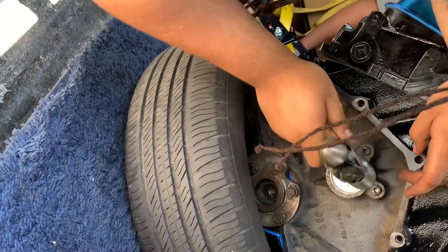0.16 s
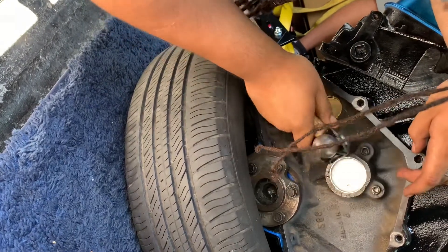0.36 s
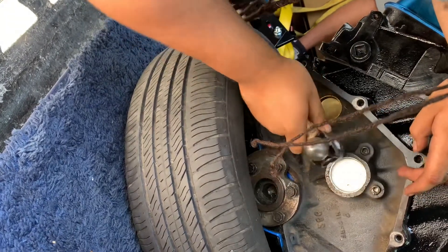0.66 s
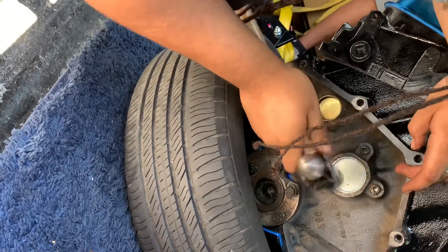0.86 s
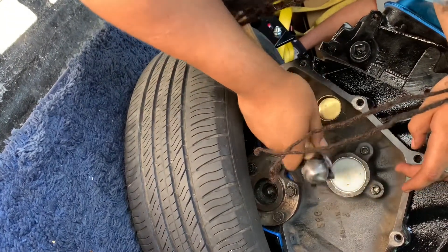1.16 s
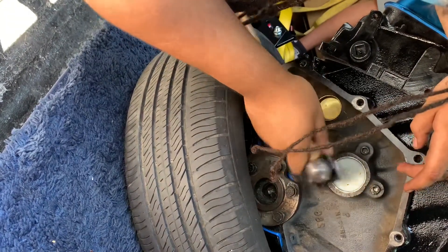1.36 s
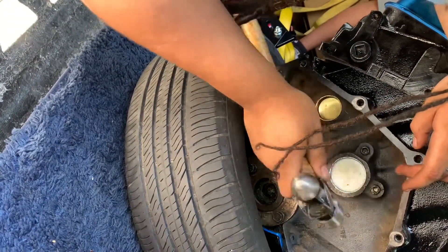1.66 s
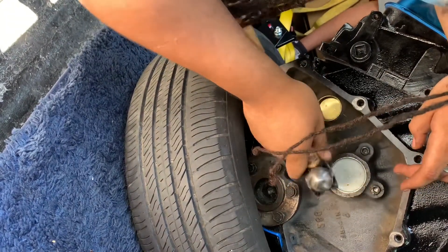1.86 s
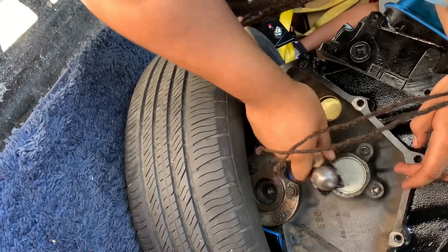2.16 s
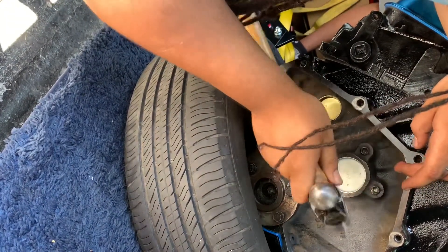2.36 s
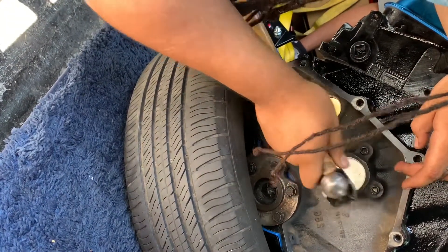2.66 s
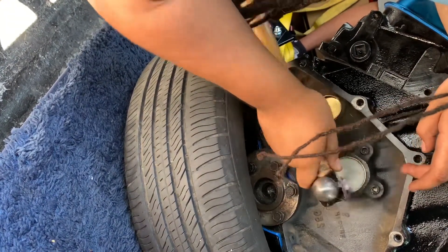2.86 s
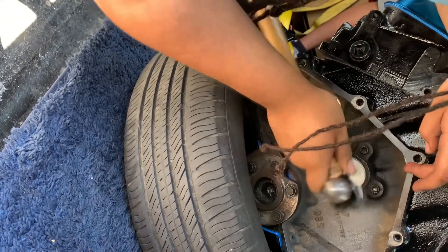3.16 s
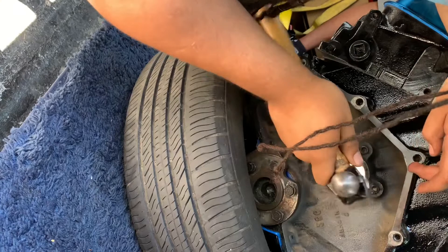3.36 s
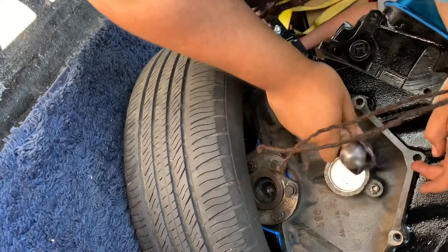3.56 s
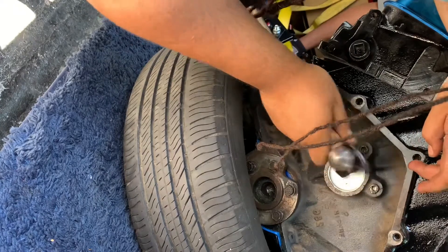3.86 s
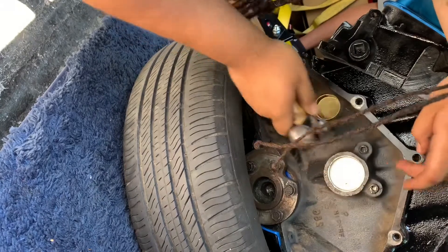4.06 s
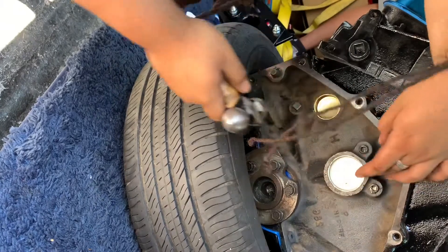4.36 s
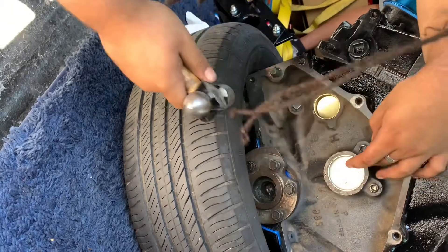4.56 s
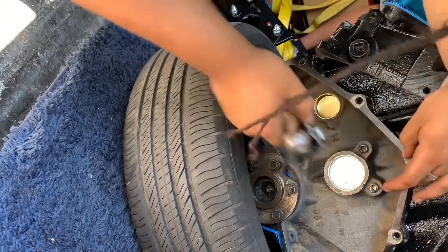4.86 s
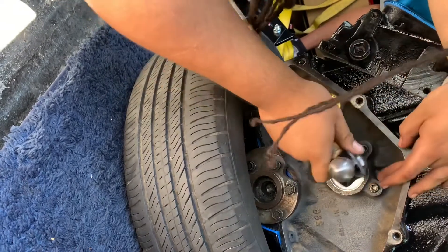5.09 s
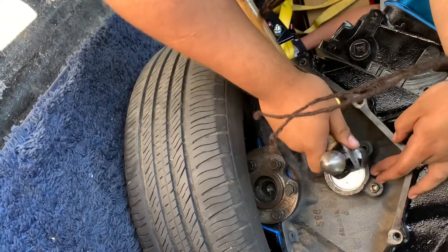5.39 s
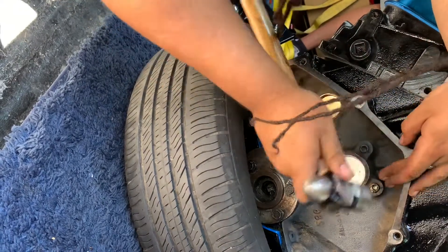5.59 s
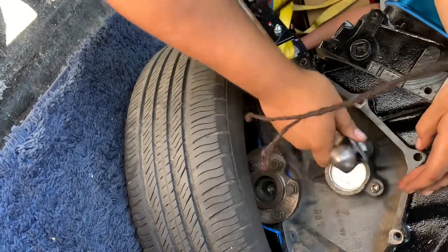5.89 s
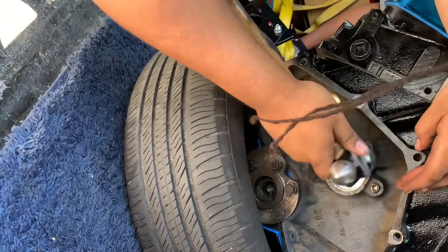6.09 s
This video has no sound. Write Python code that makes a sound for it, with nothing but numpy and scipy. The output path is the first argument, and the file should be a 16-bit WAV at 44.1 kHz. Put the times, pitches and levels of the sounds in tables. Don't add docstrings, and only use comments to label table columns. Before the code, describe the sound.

Close up in an open cargo bed, a steel hammer knocks a cap into a cast metal housing. Firm, evenly spaced clanks with bright ticks and short rings repeat almost three times a second, each with a rattle and brief echo. They stop for about a second, two very light taps follow, then one more full blow. Faint distant traffic rumble and thin hiss lie underneath.

```python
import sys
import numpy as np
from scipy import signal
from scipy.io import wavfile
from scipy.ndimage import uniform_filter1d

SR = 44100
rng = np.random.default_rng(int(sys.argv[2]) if len(sys.argv) > 2 else 0)


def digitize_waveform(pressure):
    field = np.atleast_2d(pressure).T
    bounded = np.clip(field, -1, 1)
    quanta = np.round(bounded * 32767).astype(np.int16)
    wavfile.write(sys.argv[1], SR, quanta)


def amplitude_ratio(level_db):
    exponent = np.asarray(level_db, float) / 20
    return 10 ** exponent


N = 274743

# start_s, strength_db, clank_hz, edge_db, off_centre_0_to_1
HAMMER_BLOWS = [(-.19, 0, 2194, 2.5, 1), (.172, -1.5, 2360, 4.5, 0.13), (.548, 1, 2200, 2.5, 0.56),
                (0.93, -0.5, 2440, 3, 0.5), (1.309, 0, 2210, 1.5, .8), (1.685, 1, 2030, 0.5, 0.38),
                (2.048, 3, 2250, -0.5, 0.32), (2.409, 1, 2030, 1, 0.58), (2.76, 0.5, 2290, 0.5, 0.9),
                (3.115, -2, 2280, 4, 0.34), (3.463, -0.5, 2220, 4, 0.1), (3.812, -1, 2170, 4, .4),
                (5.059, -27.5, 1860, 0, 0.83), (5.238, -26, 1900, -7.5, 0.7), (5.773, 0, 2060, 0.5, .9)]
# pitch_hz, level_db, t60_s
THUMP_MODES = [(230, -14, 0.01), (301, -13, 0.062), (449, -10.5, 0.025), (572, 9, 0.018),
               (652.5, -1.5, 0.05), (829, -6.5, 0.0079)]
# pitch_hz, level_db, t60_s
CLANK_MODES = [(965, -22, .05), (1108, -18, .03), (1300, -17, .03), (1430, -18, .04), (1750, -17, .06),
               (1990, -4.5, .035), (2277, -6.5, .029), (2602, -9, .03), (3250, -14, .028),
               (3620, -16, .045), (3995, -15.5, .03), (4800, -15.5, .012), (6100, -13, .03),
               (6714, -17, .025)]
# pitch_hz, level_db, t60_s
SINGING_MODES = [(662, -48, .3), (1087, -60, .45), (1583, -58, .5), (1740, -55, .86), (1895, -53, .45),
                 (2025, -53, .5), (1965, -52, .7), (2073, -50, .25), (2293, -57, .84), (3246, -52, .2),
                 (4590, -68, .5)]
# pitch_hz, level_db, t60_s
TICK_MODES = [(9150, -10, .06), (9600, 2.5, 0.013), (10200, 5.5, 0.011), (10300, -6.5, 0.0047),
              (12060, -15.5, 0.03), (11500, -10.5, 0.0083), (15500, -4, .014)]
# pitch_hz, level_db, t60_s
PING_MODES = [
    (7210, -4, .13),
    (13855, 9, .1),
    (13200, 8, .11),
]
# pitch_hz, level_db, t60_s
BED_MODES = [(52, -38, 0.49), (110, -43, 0.087), (145, -27.5, 0.13)]
# pitch_hz, level_db_per_hz
CRACK_COLOUR = [(760, -50.5), (1300, -20), (2050, -7), (2820, -16.5), (3180, -17.5), (6830, -24),
                (8360, -28.5), (10000, -23), (16500, -47)]
# pitch_hz, rattle_db_per_khz, rattle_t60_s, echo_db_per_khz, echo_t60_s
THROWN_BACK = [(150, -35.5, 0.22, -57, 1), (620, -28.5, 0.2, -52.5, 0.87), (900, -32.5, 0.14, -47.5, 0.25),
               (1400, -29.5, 0.16, -49.5, 0.65), (2050, -22, 0.23, -40.5, 0.64),
               (2500, -29.5, 0.17, -52.5, 0.59), (4200, -29, 0.065, -50, 0.32),
               (7200, -35.5, 0.12, -69, 0.8), (8400, -48.5, .1, -79, .6), (10500, -39.5, 0.21, -76.5, 0.99),
               (12600, -48.5, 0.11, -75, .9), (15500, -53, .06, -86.5, .8)]
RATTLE_LIFT = [0.5, -2, 0.5, -5.5]
# pitch_hz, likeness_0_to_1
ECHO_LIKENESS = [(300, 0.93), (800, .85), (1500, 0.26), (6000, 0.08), (8500, 0.76)]
# start_s, level_db, start_hz, end_hz, tap_db
BED_BUMPS = [
    (1.939, -31, 200, 80, -13),
    (2.343, -40, 200, 130, -2),
    (.868, -52, 200, 120, -12),
    (4.54, -58, 520, 250, 3),
    (4.92, -57, 650, 400, 0),
    (5.990, -53, 1500, 600, 4),
    (2.340, -54, 1500, 1000, -3),
]
# pitch_hz, level_db_per_hz
RUMBLE_COLOUR = [(15, -44), (25, -10.5), (87, -1.5), (118, -11), (159, -8), (226, -21), (313, -19.5),
                 (524, -26), (746, -31), (4700, -56.5), (6000, -62), (11600, -49.5), (16500, -60.5)]
# pitch_hz, likeness_0_to_1
RUMBLE_LIKENESS = [(60, 0.9), (180, 0.95), (550, 0.6), (1650, 0.93), (4970, 0.62), (15000, 0.19)]
# pitch_hz, level_db_per_hz
HISS_COLOUR = [(880, -43), (1500, -9.5), (1680, 0), (2260, -8.5), (4610, -9), (7030, -19.5), (8600, -31),
               (10700, -15), (15500, -28), (16500, -32.5)]
# start_s, end_s, level_db
HISS_GATE = [
    (-1, 3.8, -80),
    (3.8, 4.42, -77),
    (5.06, 5.5, -85),
    (5.8, 6.3, -97),
]

LAG_S = .000173
TAIL, STRIKE = 30000, 8192
ECHO_SHARE = .87
SOFT_SHARE = .62


def blow(start_s, strength_db, clank_hz, edge_db, off_centre):
    long = np.arange(TAIL) / SR - np.array([[LAG_S], [0]])
    t = long[:, :STRIKE]
    late = t - .0026
    out = amplitude_ratio(ECHO_SHARE * strength_db) * thrown_back(edge_db)
    out += singing(long, strength_db)
    out += bed_boom(long, strength_db)
    direct = housing(t, late, clank_hz) + amplitude_ratio(edge_db) * contact(t, late)
    out[:, :STRIKE] += amplitude_ratio(strength_db) * direct + head_pings(t, strength_db, off_centre)
    pan_db = 1.2 * rng.uniform(-1, 1)
    return start_s, out * amplitude_ratio([[pan_db / 2], [-pan_db / 2]])


def housing(t, late, clank_hz):
    walls = CLANK_MODES + [(clank_hz, 0, .04)]
    clank = modes(walls, t, 2., turns=1.2) + 0.83 * modes(walls, late, 2., turns=1.2)
    thump = modes(THUMP_MODES, late + 0.0018, 1.0, rise_s=0.0011)
    return amplitude_ratio(-7) * clank + amplitude_ratio(-12.5) * thump


def contact(t, late):
    first = amplitude_ratio(-60 * abs(t) / 0.059) * (t > 0)
    second = 0.35 * amplitude_ratio(-60 * abs(late) / 0.011) * (late > 0)
    crack = shaped(STRIKE, CRACK_COLOUR) * (first + second)
    tick = modes(TICK_MODES, t, 2., turns=0.48) + 0.39 * modes(TICK_MODES, late, 2., turns=0.61)
    return amplitude_ratio(-16.5) * crack + amplitude_ratio(-19) * tick


def head_pings(t, strength_db, off_centre):
    low_db = -30.5 + strength_db / 4 - 19 * (1 - off_centre)
    high_db = SOFT_SHARE * strength_db - 30 * off_centre ** 3
    levels_db = low_db, high_db - 31, high_db - 48
    return sum(amplitude_ratio(db) * modes([ping], t, 0.) for db, ping in zip(levels_db, PING_MODES))


def singing(t, strength_db):
    flutter = .85 + .4 * evened(uniform_filter1d(rng.standard_normal(TAIL), size=1200))
    sound = modes(SINGING_MODES, t, 2., turns=1.2, rise_s=.005)
    return amplitude_ratio(2.5 + ECHO_SHARE * strength_db) * flutter * sound


def bed_boom(t, strength_db):
    return amplitude_ratio(-.5 + SOFT_SHARE * strength_db) * modes(BED_MODES, t, 1.0, turns=0.43, rise_s=0.029)


def thrown_back(edge_db):
    lift_db = np.add(RATTLE_LIFT, [0, 0, 2.5 * edge_db, edge_db]) + [0, 2.5, 1, -3]
    colour = list(zip((600, 2100, 4500, 10500), lift_db))

    def decay(hz, t):
        near = amplitude_ratio(read(THROWN_BACK, hz, axis=1) - 60 * t / read(THROWN_BACK, hz, axis=2))
        far = amplitude_ratio(read(THROWN_BACK, hz, axis=3) - 60 * t / read(THROWN_BACK, hz, axis=4))
        return np.hypot(near, far) * amplitude_ratio(read(colour, hz)) * np.sqrt(SR / 2000)

    onset = np.clip(np.arange(TAIL) / SR / 0.0038 - .6, 0, 1)
    return port_noise(TAIL, decay) * onset


def bump(start_s, level_db, start_hz, end_hz, tap_db):
    t = np.arange(SR // 2) / SR
    hz = end_hz + (start_hz - end_hz) * np.exp(-t / 0.025)
    fade = amplitude_ratio(-60 * t * start_hz / 65)
    wobble = np.sin(2 * np.pi * np.cumsum(hz) / SR) * fade * (1 - np.exp(-t / 0.0046))
    wobble *= 1.2 + .45 * np.cos(2 * np.pi * 45 * (t - .01))
    dull = uniform_filter1d(uniform_filter1d(rng.standard_normal(len(t)), size=34), size=52)
    tap = evened(dull) * amplitude_ratio(tap_db - 60 * t / .05) * (1 - np.exp(-t / 0.0042))
    return start_s, amplitude_ratio(level_db) * (wobble + tap) * np.ones((2, 1))


def rumble():
    frames, hz = N // 512 + 5, np.fft.rfftfreq(2048, 1 / SR)
    a, b, c, d, patches = rng.standard_normal((frames, 1025, 5)).T
    patches = evened(uniform_filter1d(uniform_filter1d(patches, 12, 0), 8, 1))
    same = np.clip(read(RUMBLE_LIKENESS, hz), -1, 1)[:, None]
    left = a + 1j * b
    right = same * left + np.sqrt(1 - same ** 2) * (c + 1j * d)
    z = np.array([left, right]) * amplitude_ratio(read(RUMBLE_COLOUR, hz)[:, None] + 0.52 * patches)
    return amplitude_ratio(-56.5) * evened(signal.istft(z, nperseg=2048, noverlap=1536)[1][:, :N])


def hiss():
    t = np.arange(N) / SR
    shut_db, gate_s = -104, .15
    level_db = np.full(N, float(shut_db))
    for start_s, end_s, open_db in HISS_GATE:
        opening = np.clip(np.minimum(t - start_s, end_s - t) / gate_s + .5, 0, 1)
        level_db += (open_db - shut_db) * opening
    return shaped(N, HISS_COLOUR) * amplitude_ratio(level_db)


def modes(table, t, spread_db, turns=0., rise_s=0.00087):
    out = 0
    for (hz, db, t60), luck in zip(table, rng.standard_normal((len(table), 5))):
        phase = 3 * luck[0] * turns + luck[1:3, None] * turns * (1000 < hz < 6300)
        size = amplitude_ratio(db + spread_db * luck[3] - 60 * t / t60) * (1 - np.exp(-t / rise_s))
        out = out + size * np.sin(2 * np.pi * hz * (1 + luck[4] / 500) * t + phase)
    return out * (t > 0)


def port_noise(size, gain):
    hz, t, (a, b) = signal.stft(rng.standard_normal((2, size)), SR, nperseg=256)
    hz = hz[:, None]
    same = np.clip(read(ECHO_LIKENESS, hz), 0, 1)
    left = (same * a + np.sqrt(1 - same ** 2) * b) * np.exp(-2j * np.pi * hz * LAG_S)
    return signal.istft(np.array([left, a]) * gain(hz, t), SR, nperseg=256)[1][:, :size]


def shaped(size, table):
    return evened(port_noise(size, lambda hz, _: amplitude_ratio(read(table, hz))))


def evened(x):
    return x / np.sqrt(np.mean(x ** 2) + 1e-20)


def read(points, hz, axis=1):
    rows = np.transpose(points)
    return np.interp(np.log(hz + 1), np.log(rows[0] + 1), rows[axis])


def add(mix, start_s, sound):
    part = mix[:, round((start_s + 1) * SR):][:, :sound.shape[1]]
    part += sound[:, :part.shape[1]]


def scene():
    mix = np.zeros((2, N + SR))
    for row in HAMMER_BLOWS:
        add(mix, *blow(*row))
    for row in BED_BUMPS:
        add(mix, *bump(*row))
    return mix[:, SR:] + rumble() + hiss()


def smear(start_s, strength_db):
    block_s, block_start_s, least_lead_s = 1024 / SR, 267 / SR, .0125
    lead_s = (start_s - block_start_s - least_lead_s) % block_s + least_lead_s
    lead_ms = 1000 * lead_s
    size = round(lead_s * SR)
    bands = np.repeat(rng.random(44), 3)[:129, None]

    def patchy(hz, _):
        colour_db = np.maximum(read(CRACK_COLOUR, hz), -21.5) + 10 * bands
        return amplitude_ratio(colour_db) * (bands > .35) * (hz < 8200)

    noise = evened(port_noise(2048, patchy))[:, 300:300 + size]
    level_db = -12 + 1.8 * strength_db - .5 * lead_ms
    fall_db = 1.2 * lead_ms * np.linspace(1, 0, size) ** 1.2
    swell = amplitude_ratio(level_db - fall_db) * np.clip(np.arange(size) / 150, 0, 1)
    return start_s + .001 - size / SR, noise * swell


def holes(x):
    hz, t, z = signal.stft(np.array([x[0] + x[1], x[0] - x[1]]) / 2, SR, nperseg=1024)
    power = z.real[:, :512] ** 2 + z.imag[:, :512] ** 2
    band_db = 10 * np.log10(power + 1e-20).reshape(2, 32, 16, -1).mean(2)
    luck = evened(uniform_filter1d(rng.standard_normal(band_db.shape), size=9))
    bar_db = np.maximum(band_db.max((0, 1)) - 45.5, -112) + 6 * luck
    z[:, :512] *= np.repeat(band_db > bar_db, 16, axis=1) | (hz[:512, None] < 7600)
    mid, side = signal.istft(z, SR, nperseg=1024)[1][:, :N]
    return np.array([mid + side, mid - side])


def band_limit(x):
    return signal.sosfilt(signal.butter(12, 16980, fs=SR, output="sos"), x)


def record(dry):
    dry = signal.sosfilt(signal.butter(2, 38, "high", fs=SR, output="sos"), dry)
    squeezed = dry / (1 + (dry / .9) ** 6) ** (1 / 6)
    squeezed = np.pad(squeezed, ((0, 0), (SR, 0)))
    for start_s, strength_db, *_ in HAMMER_BLOWS:
        add(squeezed, *smear(start_s, strength_db))
    edge = signal.firwin(255, 16500, window=("kaiser", 9), fs=SR)
    limited = signal.oaconvolve(holes(squeezed[:, SR:]), edge[None], "same")
    return band_limit(limited)


dry = scene()
out = record(dry)
digitize_waveform(out)
```